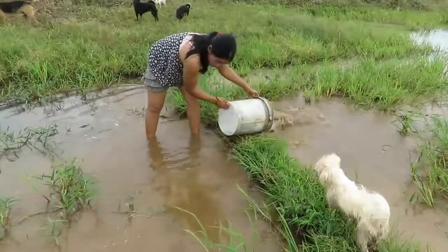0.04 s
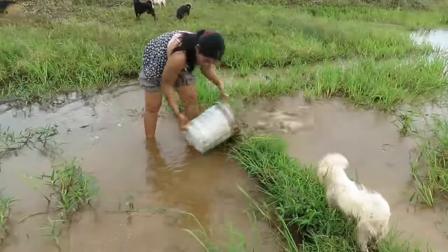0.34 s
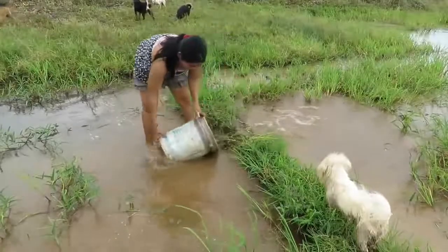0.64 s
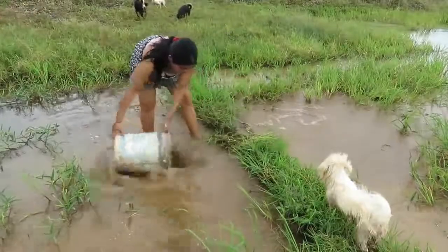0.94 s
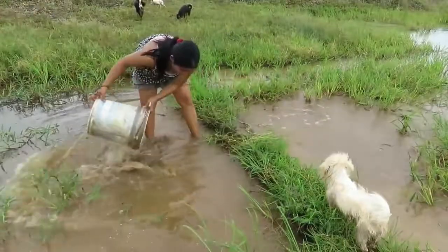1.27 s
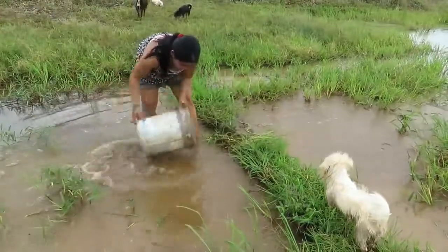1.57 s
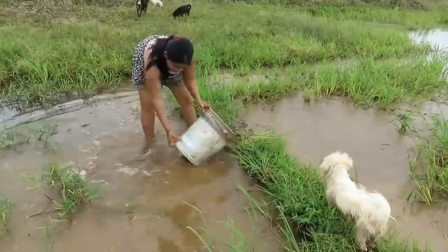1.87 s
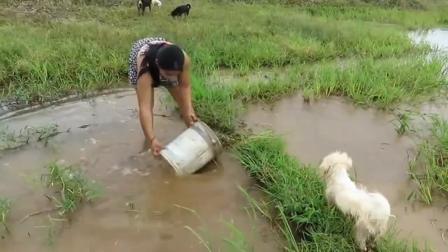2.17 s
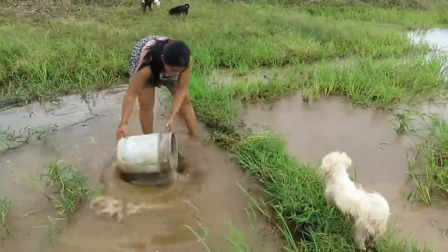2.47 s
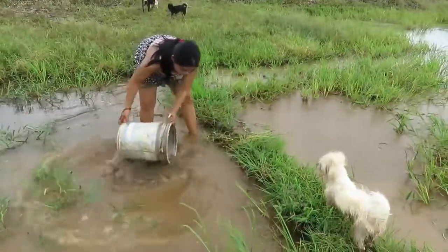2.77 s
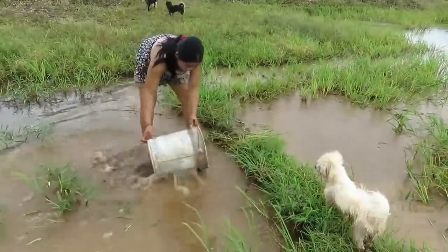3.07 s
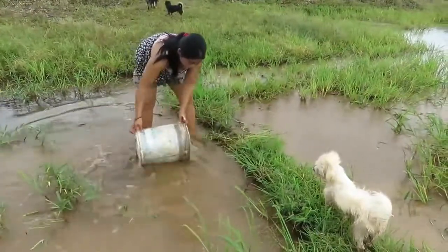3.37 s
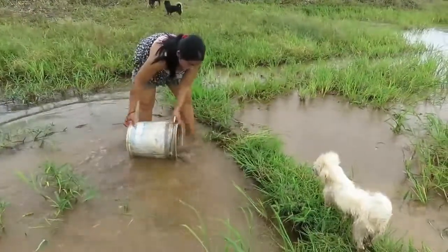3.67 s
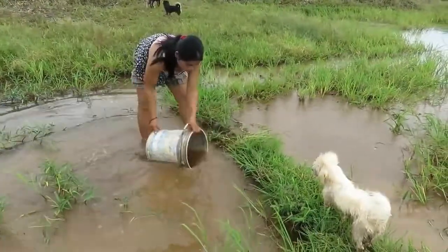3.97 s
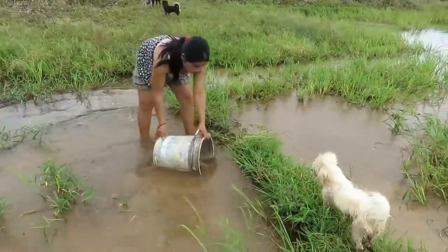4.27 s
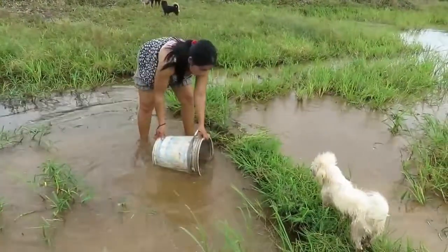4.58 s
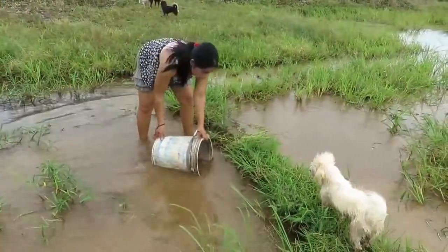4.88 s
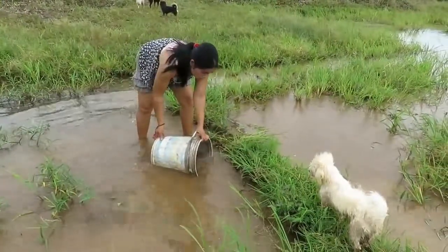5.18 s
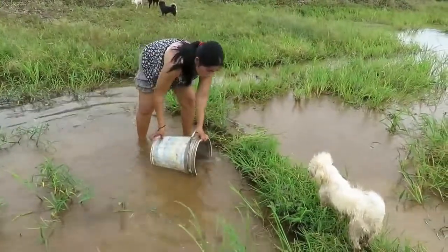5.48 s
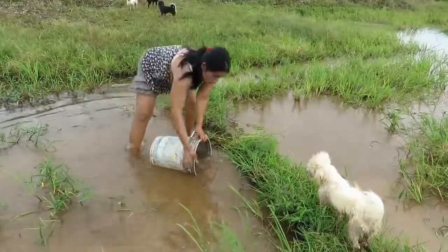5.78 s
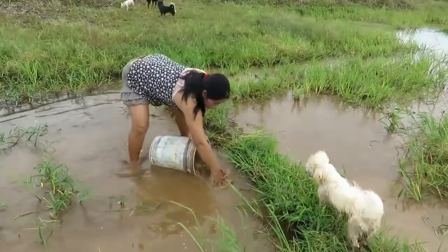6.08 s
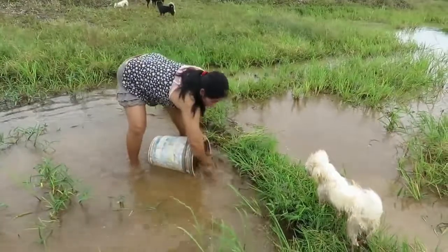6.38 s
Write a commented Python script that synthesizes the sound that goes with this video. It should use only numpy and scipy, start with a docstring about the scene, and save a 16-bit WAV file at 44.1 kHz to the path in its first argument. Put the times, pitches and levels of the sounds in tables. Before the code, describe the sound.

A plastic bucket bails a shallow pool outdoors, a few steps from the microphone. Twice it dips in with a slap and a gulping slosh, then the water is thrown out in a wide splash that patters down. The splashing then eases to smaller sloshes, drips and plinks while puffs of wind thud on the microphone. After a lull, a few light splashes return over the faint hiss of an open field.

```python
"""Bailing a muddy pool

A plastic bucket scoops and pours shallow water outdoors. Each scoop or pour is a swarm of ringing bubbles
and spray that swells, holds and settles; slaps, ticks of spatter and single plinks stand out of it.
Puffs of wind thud on the microphone, over the faint hiss of an open field."""
import sys
import numpy as np
from scipy import signal
from scipy.fft import rfft, irfft, next_fast_len
from scipy.io import wavfile
from scipy.ndimage import map_coordinates

SR = 44100
rng = np.random.default_rng(int(sys.argv[2]) if len(sys.argv) > 2 else 0)


def store_pcm(level_fs):
    """Save levels as 16-bit WAV."""
    pcm = np.round(np.clip(level_fs, -1, 1) * 32767).astype(np.int16)
    wavfile.write(sys.argv[1], SR, np.atleast_2d(pcm).T)


N = 288079
LEAD_SAMPLES = 512  # the faint lead-in to a slap or tick

# tone of the difference between left and right in the rumble and thuds: (frequency [Hz], level [dB])
LOW_SIDE_TONE = [(30, -46), (120, -19), (200, 1), (420, 4.5), (550, -12), (780, -15.5), (1600, -39)]


def amp(db):
    """Turn decibels into a number to multiply by."""
    return 10 ** (np.asarray(db) / 20)


def unit(x):
    """Scale a sound to an average power of 1."""
    return x / np.sqrt(np.mean(x ** 2) + 1e-20)


def along(points, hz):
    """Read between (frequency, value) points, with octaves evenly spaced."""
    freqs, values = np.transpose(points)
    return np.interp(np.log(hz + 1), np.log(freqs + 1), values)


def wobble(rate):
    """A smooth curve through `rate` random values a second."""
    values = rng.standard_normal(int(N * rate / SR) + 4)
    return map_coordinates(values, [np.arange(N) * rate / SR])


def filtered(x, response):
    """Multiply each frequency in a sound by response(frequency)."""
    n = x.shape[-1]
    padded = next_fast_len(n + 4096, real=True)
    hz = np.fft.rfftfreq(padded, 1 / SR)
    return irfft(rfft(x, padded) * response(hz), padded)[..., :n]


def coloured(x, tone):
    """Shape a sound with a tone table, fading out the treble above its last point."""
    return filtered(x, lambda hz: amp(along(tone, hz)) / (1 + (hz / (2 * tone[-1][0])) ** 2))


def held(sound, db, length_s):
    """Give a sound the energy of a steady one of this level and length."""
    return amp(db) * unit(sound) * np.sqrt(length_s * SR / len(sound))


def add(track, s, sound):
    """Mix a sound into a track at s seconds."""
    start = max(round(s * SR), 0)
    part = track[..., start:start + sound.shape[-1]]
    part += sound[..., :part.shape[-1]]


def field():
    """The faint, even hiss of open grassland."""
    # tone of the field: (frequency [Hz], level [dB])
    tone = [(18, -42), (30, -3), (163, -4), (2130, -12.5), (2840, -17), (9890, -32), (13200, -37),
            (15000, -62)]
    return amp(-59) * unit(coloured(rng.standard_normal(N), tone))


def low_rumble():
    """Low rumble: wind on the microphone, and the bucket's deep slosh near 0.85 s."""
    # strength of the rumble: (time [s], relative level [dB])
    strength = [(0.0, -45), (0.54, -57.5), (0.85, -44.5), (1.73, -51), (2.3, -43.5), (2.54, -35),
                (3.25, -40), (3.9, -34), (4.25, -44.5), (4.64, -32), (4.98, -47.5), (5.84, -37),
                (6.53, -47.5)]
    # tone of the rumble: (frequency [Hz], level [dB])
    tone = [(20, -43), (65, -4.5), (140, 1.5), (220, 3), (330, -2), (460, -10), (560, -40), (1200, -38.5)]
    db = np.interp(np.arange(N) / SR, *np.transpose(strength))
    # mid is what left and right share, side is how they differ
    mid, side = rng.standard_normal((2, N)) * amp(4.6 * wobble(45))
    side_db = -20 + 0.8 * (db - db.mean())  # a louder rumble sounds wider
    mid = unit(coloured(mid, tone))
    side = amp(side_db) * unit(coloured(side, LOW_SIDE_TONE))
    return amp(db + 2.5) * np.array([mid, side])


def gusts():
    """Puffs of wind break into uneven swirls that thud on the microphone. Gives mid and side."""
    # puffs of wind: (time [s], level [dB], length [s])
    puffs = [(0.158, -30, 0.018), (1.82, -28, 0.028), (2.513, -13, 0.0064), (2.671, -19, 0.0078),
             (2.758, -23, 0.023), (2.8, -19.5, 0.0048), (3.014, -18, 0.017), (3.432, -16.5, 0.015),
             (3.571, -19.5, 0.032), (3.602, -11, 0.015), (3.77, -20.5, 0.0096), (3.838, -20.5, 0.01),
             (3.878, -23.5, 0.013), (4.105, -28, 0.0093), (4.586, -20.5, 0.014), (4.649, -12.5, 0.044),
             (4.69, -14.5, 0.012), (4.74, -18.5, 0.024), (4.883, -28, 0.0063), (4.984, -19.5, 0.0047),
             (5.333, -28, 0.011), (5.436, -29, 0.019), (6.069, -27, 0.0074)]
    # tone of a thud: (frequency [Hz], level [dB])
    tone = [(20, -27), (65, -24.5), (130, -2.5), (230, -1.5), (460, -4.5), (570, -24), (900, -30),
            (1600, -56)]
    swirls_per_s, swirl_db = 70.1, 3.5
    pair = np.zeros((2, N))
    t = np.arange(-SR // 7, SR // 7) / SR
    for s, db, length_s in puffs:
        swirls = map_coordinates(rng.standard_normal(len(t)), [(t - t[0]) * swirls_per_s])
        shape = amp(swirl_db * swirls) / np.cosh(2 * t / length_s)
        mid, side = rng.standard_normal((2, len(t))) * shape
        side_db = min(-4.5 + 1.6 * (db + 22), -5.5)  # harder puffs sound wider
        mid = held(coloured(mid, tone), db, length_s)
        side = held(coloured(side, LOW_SIDE_TONE), db + side_db, length_s)
        add(pair, s + t[0], np.array([mid, side]))
    return pair


def burst(hz, length_s, sharpness):
    """A short rush of noise around one pitch, with a faint, soft lead-in just before the hit."""
    t = np.arange(-LEAD_SAMPLES, SR // 10) / SR
    rise = 1 - np.exp(-np.maximum(t, 0) / (0.19 * length_s))
    shape = np.exp(-abs(t) / (1.38 * length_s)) * (0.18 + rise)
    noise = shape * rng.standard_normal(len(t))
    return filtered(noise, lambda f: 1j * f * hz / (sharpness * (hz * hz - f * f) + 1j * f * hz))


def spatter():
    """Spatter ticks on the bucket: very brief and bright, with no ring."""
    # ticks: (time [s], relative level [dB], pitch [Hz])
    ticks = [(.03, -20.5, 7000), (0.439, -11, 3920), (.66, -13.5, 2710), (0.816, -19, 5400),
             (0.852, -14.5, 4870), (1.804, -18, 4500), (2.04, -15, 3570), (2.066, -17, 4270),
             (2.248, -21.5, 7450), (2.344, -14, 8850), (3.09, -8, 4440), (3.413, -28, 9000),
             (3.463, -18.5, 8050), (3.62, -24, 9320), (3.679, -22.5, 4600), (3.885, -23, 4760),
             (4.041, -25.5, 8700), (4.128, -23.5, 7780), (4.259, -16, 5170), (4.476, -21.5, 4760),
             (5.077, -31, 4600), (5.18, -28, 3700), (6.03, -25.5, 7560), (6.12, -20.5, 4870)]
    length_s = 0.0019
    track = np.zeros(N)
    for s, db, hz in ticks:
        tick = burst(hz, length_s, sharpness=4.5)
        tick = filtered(tick, lambda f: 1 / (1 + (f / 12500) ** 4))
        add(track, s - LEAD_SAMPLES / SR, held(tick, db - 16, length_s))
    return track


def slaps():
    """Each slap squeezes out trapped air: a ragged burst, deeper and longer for a bigger pocket."""
    # water hitting the bucket and the pool: (time [s], level [dB], pitch [Hz])
    hits = [(.14, -25, 1360), (.389, -31, 950), (.695, -28, 1530), (.778, -16, 1350), (.79, -13, 1360),
            (.796, -17, 1450), (0.815, -19, 1780), (.851, -19, 2300), (1.127, -24, 1465),
            (1.975, -19.5, 905), (1.982, -21, 1090), (2.094, -19.5, 980), (2.166, -18, 740),
            (2.376, -12, 840), (2.39, -15, 745), (2.446, -21, 1330), (2.688, -20, 1910),
            (3.089, -19.5, 2040), (3.105, -20.5, 1500), (3.464, -24.5, 1860), (3.678, -23.5, 2280),
            (3.993, -24.5, 1100), (4.004, -27, 1480), (4.246, -24, 1480), (4.283, -22.5, 2160),
            (4.364, -30, 1280), (4.415, -30.5, 2040), (4.633, -30, 1500), (6.149, -19.5, 1360),
            (6.373, -28.5, 1700)]
    # tone of a slap: (frequency [Hz], level [dB])
    tone = [(150, 16), (450, 0.5), (1500, -2.5), (2400, -4), (3000, -14), (4900, -10), (6200, -22),
            (12000, -18.5), (15800, -35)]
    cycles = 4.04
    track = np.zeros(N)
    for s, db, hz in hits:
        length_s = cycles / hz
        slap = coloured(burst(hz, length_s, sharpness=1.8), tone)
        # a small pocket gives off little sound below its pitch
        slap = filtered(slap, lambda f: 1j * f / (1j * f + 0.23 * hz))
        add(track, s - LEAD_SAMPLES / SR, held(slap, db, length_s))
    return track


def single_bubbles(glide=0.039):
    """Trapped bubbles ring and rise a little in pitch: hard pops end at once, gentle plinks ring on."""
    # bubbles, from high plinks to deep glugs: (time [s], level [dB], pitch [Hz])
    pops = [(0.175, -26.5, 285), (.66, -10.5, 2150), (.791, -5, 1014), (.992, -21, 626),
            (1.058, -17.5, 855), (1.242, -13, 796), (1.309, -15.5, 790), (1.672, -28.5, 628),
            (1.98, -14, 318), (2.096, -23, 274), (2.167, -8, 1330), (2.173, -18, 274), (2.282, -17, 700),
            (2.317, -12, 3780), (2.335, -6, 1610), (2.402, -7.5, 203.5), (2.474, -13, 554),
            (2.869, -18.5, 950), (3.102, -14.5, 662), (4.162, -23.5, 815), (4.511, -21, 1810),
            (4.916, -32.5, 2100), (5.087, -32, 1550), (5.26, -20, 1860), (5.259, -26, 1390),
            (5.331, -29.5, 2300), (5.721, -27, 1840), (5.824, -32, 1880), (5.898, -30, 1750),
            (6.1, -28, 2540), (6.121, -23, 780), (6.154, -17.5, 770), (6.214, -10.5, 1470),
            (6.24, -28, 2780), (6.242, -22, 1540), (6.294, -20.5, 754), (6.343, -17.5, 2250),
            (6.443, -28, 2190), (6.501, -22, 2450), (6.516, -9, 2360)]
    track = np.zeros(N)
    t = np.arange(SR // 12) / SR
    for s, db, hz in pops:
        fade_cycles = 2.14 * amp(-0.25 * db)
        age = t * hz / fade_cycles
        shape = np.exp(-age) * (1 - np.exp(-t * hz / 0.49))
        ring = np.sin(2 * np.pi * hz * t * (1 + glide * age / 2))
        # the heaving surface makes the ring unsteady
        heave = 1 + 0.25 * map_coordinates(rng.standard_normal(len(t)), [t * hz / 2])
        add(track, s, amp(db) * shape * ring * heave)
    return track


def swarm(count, low_hz, high_hz, cycles, spread_db, samples, glide=0.039):
    """Bubbles at random times: fading tones whose pitch climbs as they near the surface."""
    when, pitch, life, strength, polarity = rng.random((count, 5)).T[:, :, None]
    hz = low_hz * (high_hz / low_hz) ** pitch
    t = np.arange(samples) / SR
    age = t * hz / (cycles * (0.5 + life))
    wave = np.sin(2 * np.pi * hz * t * (1 + glide * np.minimum(age, 2))) * np.sign(polarity - 0.5)
    loudness = amp(-spread_db * np.log(np.maximum(strength, 0.02)))  # many soft, a few loud
    rings = loudness * wave * np.exp(-age) * (1 - t / t[-1])
    where = (when * N).astype(int) + np.arange(samples)
    return unit(np.bincount(where.ravel(), rings.ravel(), minlength=N)[:N])  # add them all up


def churn(bubbles, tone, froth_db, flutter_db):
    """Bubbles on a bed of hissing froth, arriving in uneven clumps."""
    mix = bubbles + amp(froth_db) * rng.standard_normal(N)
    return unit(coloured(mix, tone) * amp(flutter_db * wobble(70)))


def wash_levels():
    """Gulp, splash and spray levels in dB: they swell, hold while the water is pushed, then settle."""
    # each push, scoop or pour: (start [s], hold [s], splash level [dB], settling [dB/s],
    # gulp compared with splash [dB], spray compared with splash [dB])
    washes = [(0, 0.023, -31, 180, 1.5, -9), (.05, 0.12, -35, 180, -10, -18.5),
              (.22, 0.16, -42.5, 61, -6, -14.5), (0.683, 0.41, -38, 70, 2.5, -15.5),
              (1.083, 0.27, -32.5, 39, 1, -13.5), (1.52, 0.27, -53.5, 44, -0.5, -9),
              (2.011, 0.29, -39, 30, 2.5, -16.5), (2.35, 0.28, -36, 19, 3, -10.5),
              (3.085, 0.029, -33, 450, -1.5, -3.5), (3.272, 0.069, -36, 93, -20, -14),
              (3.499, .18, -38.5, 150, -5, -12.5), (3.94, 0.075, -44.5, 18, -6, -15),
              (4.2, 0.073, -38, 46, -2, -13.5), (4.449, 0.052, -40.5, 114, 1.5, -16),
              (5.805, 0.088, -49, 51, 2.5, -14), (6.125, 0.23, -38.5, 89, -3.5, -14.5),
              (6.496, 0.037, -36.5, 100, -5, -14.5)]
    resting_db = [[-54], [-61], [-72]]  # gulp, splash, spray: the pool is never quite still
    patter_db, patter_db_per_s = -3, 19
    power = amp(resting_db) ** 2 * np.ones(N)
    for s, hold, db, settling, gulp_db, spray_db in washes:
        age = np.maximum(np.arange(N) / SR - s, 0)
        swell = np.tanh(age / (0.11 * hold))
        after = np.maximum(age - hold, 0)
        splash = swell * amp(db - abs(settling) * after)
        power += (amp([[gulp_db], [0], [spray_db]]) * splash) ** 2
        # the longer the wash, the more spray patters back down
        patter = swell * amp(db + spray_db + patter_db - patter_db_per_s * after)
        power[2] += hold * patter ** 2
    return 10 * np.log10(power)


def water():
    """Big air pockets gulp, small bubbles splash and plink, fine spray fizzes, droplets crackle."""
    # tone of the gulping: (frequency [Hz], level [dB])
    gulp_tone = [(100, -48), (260, -9), (600, 6.5), (830, 8.5), (1100, 0.5), (2000, -42)]
    # tone of the splashing: (frequency [Hz], level [dB])
    splash_tone = [(400, -31), (750, -7.5), (1050, -4.5), (1600, 3), (2400, 0), (2850, -5.5), (4000, -14),
                   (6500, -19)]
    # tone of the spray: (frequency [Hz], level [dB])
    spray_tone = [(1800, -19), (3000, -3.5), (3900, 0), (5100, -4.5), (6200, -10.5), (10000, -13.5),
                  (14000, -14), (15800, -38)]
    gulp_db, splash_db, spray_db = wash_levels()
    big = swarm(count=1400, low_hz=244.4, high_hz=1031, cycles=5.7, spread_db=2.5, samples=2000)
    small = swarm(count=6000, low_hz=833.4, high_hz=3114, cycles=6.8, spread_db=3, samples=900)
    fine = swarm(count=9000, low_hz=2850, high_hz=14450, cycles=15, spread_db=3, samples=400)
    rising = swarm(count=200, low_hz=700, high_hz=3200, cycles=10, spread_db=3, samples=1400)
    stray = swarm(count=520, low_hz=3000, high_hz=11000, cycles=1.5, spread_db=4, samples=400)
    gulp = amp(gulp_db - 1.5) * churn(big, gulp_tone, froth_db=4, flutter_db=2)
    splash = amp(splash_db + 0.93) * churn(small, splash_tone, froth_db=-3, flutter_db=2.5)
    spray = amp(spray_db + 2.6) * churn(fine, spray_tone, froth_db=2.5, flutter_db=2.4)
    # drips keep the plinks going in a lull; in a strong wash, plinks and droplets merge into the rush
    plinks = amp(np.clip(splash_db, -56, -38) - 5.5) * rising
    droplets = amp(np.minimum(spray_db, -50) - 3.5) * stray
    return gulp + splash + plinks + spray + droplets


def outdoors(sound):
    """Pool, bank and bucket scatter a brief echo, and thrown water fans out wide. Gives mid and side."""
    # stereo width: (frequency [Hz], side compared with mid [dB])
    width = [(400, -47), (1000, -50), (2400, -23), (4400, -20.5), (8000, -13), (15000, -9)]
    # bucketfuls landing off to the side: (time [s])
    throws = [1.4, 2.75]
    echo_s, throw_s, widen_db = 0.21, 0.37, 10.5
    t = np.arange(SR // 6) / SR
    echo = rng.standard_normal(len(t)) * amp(-60 * t / echo_s) * (t > 0.003)
    mid = sound + amp(-12.5) * signal.fftconvolve(sound, echo / np.linalg.norm(echo))[:N]
    fan_db = widen_db * sum(np.exp(-((np.arange(N) / SR - s) / throw_s) ** 2) for s in throws)
    side = mid * amp(fan_db) * unit(wobble(500))
    return np.array([mid, filtered(side, lambda hz: amp(along(width, hz)))])


def scene():
    """Water a few steps ahead and wind right at the microphone, mixed to left and right."""
    bailing = water() + slaps() + spatter() + single_bubbles()
    mid, side = outdoors(bailing + field()) + low_rumble() + gusts()
    return np.array([mid + side, mid - side])


def record(dry):
    """The microphone adds a faint, dull hiss and loses the very highest treble."""
    hiss_db, dull_hz, top_hz = -61.5, 3020, 15800
    noise = rng.standard_normal((2, N))
    hiss = unit(filtered(noise, lambda hz: 1 / (1 + hz / dull_hz) / (1 + (hz / 14000) ** 20)))
    return filtered(dry + amp(hiss_db) * hiss, lambda hz: hz < top_hz)


dry = scene()
out = record(dry)
store_pcm(out)
```